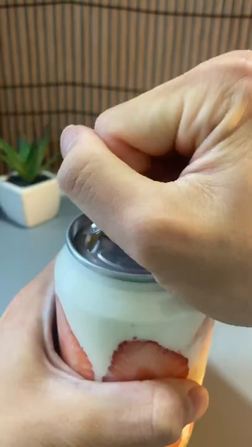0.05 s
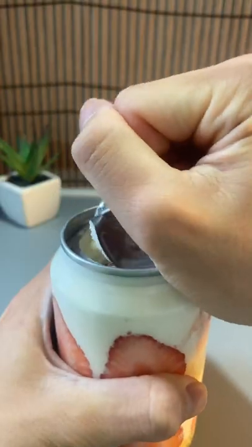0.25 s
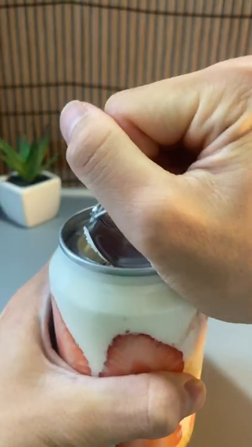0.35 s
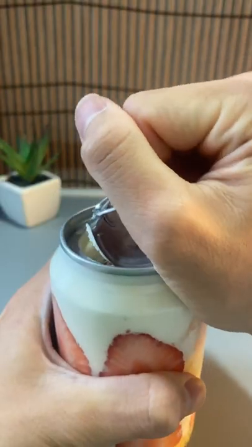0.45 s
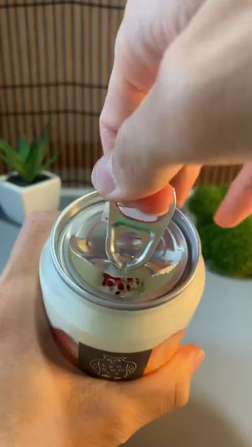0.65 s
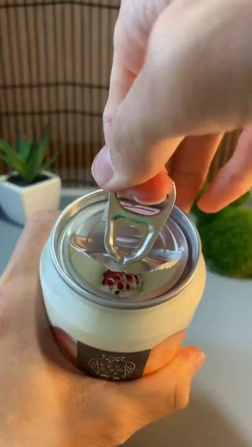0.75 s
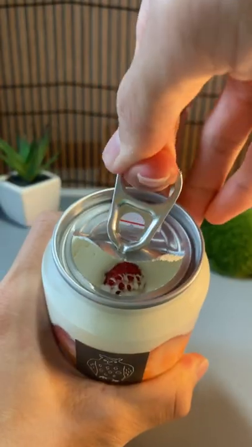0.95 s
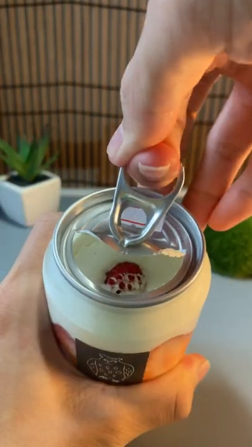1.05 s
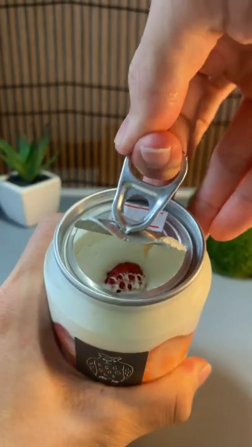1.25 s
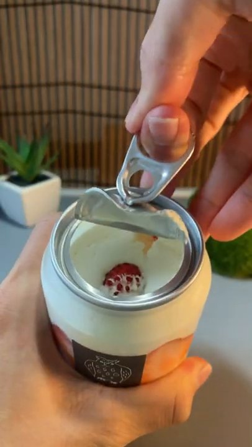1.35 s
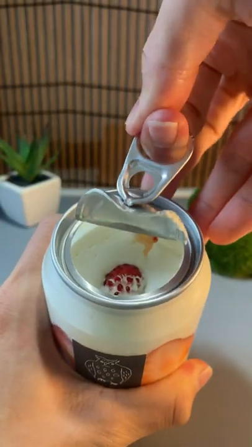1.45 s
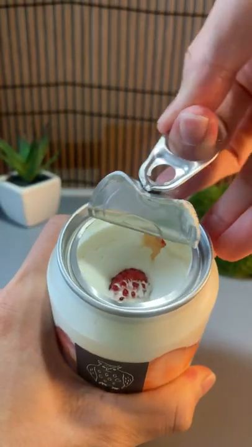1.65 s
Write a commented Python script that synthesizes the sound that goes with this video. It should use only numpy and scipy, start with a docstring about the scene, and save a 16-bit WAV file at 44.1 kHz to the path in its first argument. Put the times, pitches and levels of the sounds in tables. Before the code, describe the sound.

A metal can lid cracks open with a tab click, short rip and loud pop. After a pause it peels back with ticks, a quick tear, a springy clack and a light scrape, heard close in a small room.

```python
"""A pull-tab can is opened on a table, close to the microphone, in a small room.
The tab ticks, rips the score line and pops the lid in. Peeled back, the lid gives way in small snaps,
buckles with dull thumps, tears in one quick run, springs up and scrapes on the rim.
Each fracture or slip is a brief force that excites the resonances of the metal sheet: a single
impulse is heard as a snap, a short volley as a jerk, a dense random train as a crackle."""
import sys
import numpy as np
from scipy import signal
from scipy.fft import rfft, irfft
from scipy.io import wavfile
from scipy.ndimage import uniform_filter1d

SR = 44100
rng = np.random.default_rng(int(sys.argv[2]) if len(sys.argv) > 2 else 0)


def unload_audio(sound):
    """Save the sound as a 16-bit wav file, at the path given as the first command line argument."""
    columns = np.transpose(np.atleast_2d(sound))
    # keep every value between -1 and 1, then stretch to whole-number steps
    steps = np.round(np.clip(columns, -1, 1) * 32767)
    wavfile.write(sys.argv[1], SR, steps.astype(np.int16))


N = 74970
TIME = np.arange(N) / SR
RING_SAMPLES = 4096
RING_TIME, RING_HZ = np.arange(RING_SAMPLES) / SR, np.fft.rfftfreq(RING_SAMPLES, 1 / SR)
PORT_SPREAD = .14  # relative part of a force that differs between the two microphone ports


def amp(db):
    """Amplitude grows tenfold for every 20 dB."""
    return 10 ** (np.asarray(db) / 20)


def unit(x):
    """Normalisation to a mean energy of 1 per channel."""
    return x / np.sqrt(np.sum(x ** 2, axis=-1).mean() + 1e-20)


def read(points, hz):
    """Interpolation on a logarithmic frequency axis."""
    f, value = np.transpose(points)
    return np.interp(np.log(hz + 1), np.log(f + 1), value)


def add(mix, s, sound):
    """Superposition: a sound joins the mix at s seconds."""
    part = mix[:, max(round(s * SR), 0):][:, :sound.shape[-1]]
    part += sound[..., :part.shape[-1]]


def through(x, response):
    """Linear filtering by convolution, cut to the input's length."""
    return signal.fftconvolve(np.atleast_2d(x), np.atleast_2d(response), axes=1)[:, :x.shape[-1]]


def ring(spectrum, pitch=1, ripple_db=2, apart_hz=900, lag_cycles=.91):
    """Causal impulse response at both ports: a spectrum with mild chance peaks, its bass trailing."""
    ripple = uniform_filter1d(rng.standard_normal((3, len(RING_HZ))), size=28)
    ripple = unit(uniform_filter1d(ripple, size=18)) * np.sqrt(len(RING_HZ))
    apart = RING_HZ / (RING_HZ + apart_hz)  # treble radiates differently to each port
    log_gain = np.log(amp(read(spectrum, RING_HZ / pitch) + ripple_db * (ripple[0] + apart * ripple[1:])))
    minimum_phase = -signal.hilbert(np.hstack([log_gain, log_gain[:, -2:0:-1]])).imag[:, :len(RING_HZ)]
    lag = 2 * np.pi * lag_cycles * np.log(1 + RING_HZ / 20)
    fade = np.hanning(2 * RING_SAMPLES)[RING_SAMPLES:]
    return unit(irfft(np.exp(log_gain + 1j * (minimum_phase - lag))) * fade)


def blow(db):
    """Equal energy: the impulse that matches 1.5 ms of sound at this level."""
    return amp(db) * np.sqrt(.0015 * SR)


def snaps(rows, body, edge, sag=0, decay_s=.0007):
    """Impulse excitation: each snap rings the body, and a spray of tiny fractures rings the edge."""
    out = np.zeros((2, N))
    pitches = 1 + sag * np.linspace(.5, -.5, len(rows))
    for (s, ring_db, edge_db), pitch in zip(rows, pitches):
        fractures = rng.standard_normal(RING_SAMPLES) + PORT_SPREAD * rng.standard_normal((2, RING_SAMPLES))
        spray = (RING_TIME == 0) + .4 * fractures * np.exp(-RING_TIME / decay_s)
        add(out, s, blow(ring_db) * ring(body, pitch) + blow(edge_db) * unit(through(spray, ring(edge))))
    return out


def jerks(rows, body, edge, length_s=.0027):
    """Burst excitation: each brief volley of fractures or slips drives the body and the edge."""
    out = np.zeros((2, N))
    swell = np.sin(np.pi * np.sqrt(np.minimum(RING_TIME / length_s, 1)))
    for s, ring_db, edge_db in rows:
        force = rng.standard_normal(RING_SAMPLES) + PORT_SPREAD * rng.standard_normal((2, RING_SAMPLES))
        for db, spectrum in (ring_db, body), (edge_db, edge):
            add(out, s, blow(db) * unit(through(swell * force, ring(spectrum))))
    return out


def crackle(curve, body, edge, per_s, spread_db):
    """Shot noise: randomly timed slips of uneven size drive the body and the edge."""
    s, ring_db, edge_db = np.transpose(curve)
    size = amp(spread_db * np.minimum(rng.exponential(1, N), 2)) * rng.choice([-1, 1], N)
    size = size * (1 + PORT_SPREAD * rng.standard_normal((2, N)))
    slips = unit(size * (rng.random(N) < per_s / SR)) * np.sqrt(N)
    return sum(through(slips * amp(np.interp(TIME, s, db, left=-120, right=-120)), ring(spectrum))
               for db, spectrum in [(ring_db, body), (edge_db, edge)])


# Spectrum of the rumble. Each row: frequency in Hz, relative level in dB.
RUMBLE_SPECTRUM = [(20, -7), (90, -1), (400, -25.5), (2000, -32.5), (10000, -53), (16000, -60)]
# Its envelope. Each row: time in seconds, level in dB.
RUMBLE_LEVEL = [(0, -59), (.85, -67), (1.1, -63.5)]
def rumble():
    """Long waves from the room and the hands on the can reach both ports nearly alike."""
    noise = rng.standard_normal(N) + amp(-20) * rng.standard_normal((2, N))
    return through(noise, ring(RUMBLE_SPECTRUM)) * amp(np.interp(TIME, *np.transpose(RUMBLE_LEVEL)))


# Spectra of the taut lid and its bright edge. Each row: frequency in Hz, relative level in dB.
TAUT_LID = [(60, -21), (200, -7.5), (560, -23.5), (1050, -12), (1240, 0), (1420, -4), (1700, 5),
            (1930, -3.5), (2230, 2.5), (2600, -3.5), (3400, -13.5), (4200, -31), (9000, -46)]
TAUT_EDGE = [(300, -32.5), (3300, 3.5), (5000, 3), (7100, 4.5), (10500, -2.5), (13000, -6), (15500, -1)]
# Envelope of the rubbing. Each row: time in seconds, lid level in dB, edge level in dB.
FINGER_RUB = [(0, -72, -78), (.45, -81.5, -89), (.6, -71, -83), (.685, -73, -67)]
def finger_rub():
    """Stick-slip friction of a finger faintly excites the taut lid."""
    return crackle(FINGER_RUB, TAUT_LID, TAUT_EDGE, per_s=4300, spread_db=9)


# Resonances of the tab. Each row: frequency in Hz, relative level in dB.
TAB_SPECTRUM = [(560, -22.5), (750, -6), (1300, -11), (1680, 8), (2500, -7.5), (3100, -3.5), (4200, -32.5)]
# Clicks of the tab. Each row: start in seconds, tab level in dB, edge level in dB.
TAB_CLICKS = [(.0753, -44.5, -53.5), (.0975, -29, -39), (.469, -53.5, -67), (.635, -58, -65)]
def tab_clicks():
    """Impacts against the closed lid set the tab in free vibration."""
    return snaps(TAB_CLICKS, TAB_SPECTRUM, TAUT_EDGE)


# Jerks and crackle envelope of the rip. Each row: time in seconds, lid level in dB, edge level in dB.
RIP_JERKS = [(.2031, -20, -22), (.2049, -14, -18.5), (.2133, -18, -22.5), (.2232, -19, -13.5),
             (.2281, -30.5, -20.5), (.2412, -19.5, -26)]
RIP_CRACKLE = [(.201, -54.5, -63), (.205, -25, -28.5), (.231, -24, -24.5), (.253, -28, -34),
               (.264, -43, -53)]
def score_rip():
    """Fracture advances along the score line in jerks, ringing the taut lid."""
    return (jerks(RIP_JERKS, TAUT_LID, TAUT_EDGE)
            + crackle(RIP_CRACKLE, TAUT_LID, TAUT_EDGE, per_s=5000, spread_db=7))


# The pop and its rebounds. Each row: start in seconds, lid level in dB, edge level in dB.
POPS = [(.2495, -8.5, -34.5), (.2518, -14, -39.5), (.2538, -21.5, -42.5)]
def lid_pop():
    """A sudden release of strain: the lid pops in and rebounds."""
    return snaps(POPS, TAUT_LID, TAUT_EDGE)


# Resonances of the can wall. Each row: frequency in Hz, relative level in dB.
WALL_SPECTRUM = [(80, -10.5), (1150, 11), (2000, -3), (3400, 4.5), (8000, -35)]
def finger_knock(start_s=.534, level_db=-42):
    """One soft impact of a finger sounds the impulse response of the can wall."""
    out = np.zeros((2, N))
    add(out, start_s, blow(level_db) * ring(WALL_SPECTRUM))
    return out


# Spectra of the buckling sheet. Each row: frequency in Hz, relative level in dB.
THUMP = [(20, -20.5), (80, 3), (190, -6.5), (330, -5), (480, -20.5), (720, -13), (4000, -75.5)]
CLACK = [(200, -16.5), (1000, -6), (1550, 10), (2300, -10.5), (2950, -0.5), (3700, -20.5), (16000, -35)]
SHUDDER = [(30, -33.5), (85, 6), (700, -20), (1500, -49), (3000, -30), (6000, -55)]
# Flips of the sheet. Each row: start in seconds, thump level in dB, clack level in dB.
BUCKLES = [(0.911, -33, -41.5), (1.0126, -36.5, -44), (1.1137, -32.5, -40.5), (1.2189, -37, -41),
           (1.3963, -16, -21.5), (1.4665, -30.5, -39)]
def buckles(shudder_db=-12.5, rise_s=.0028, t60_s=.24):
    """Snap-through buckling: the sheet flips with a clack and a falling thump, then trembles."""
    out, t = np.zeros((2, N)), np.arange(SR // 2) / SR
    swell = 1 - np.exp(-t / rise_s)
    for s, thump_db, clack_db in BUCKLES:
        add(out, s, blow(thump_db) * ring(THUMP) + blow(clack_db) * ring(CLACK))
        tremble = rng.standard_normal(len(t)) * swell * amp(thump_db + shudder_db - 60 * t / t60_s)
        add(out, s, through(tremble, ring(SHUDDER)))
    return out


# Spectra of the bent lid and its torn edge. Each row: frequency in Hz, relative level in dB.
BENT_LID = [(500, -25.5), (1200, -9.5), (1450, 6), (1620, 5.5), (1950, 2.5), (2300, -17), (3400, -21.5),
            (6000, -53)]
TORN_EDGE = [(300, -18.5), (900, 1), (2900, -1.5), (4800, 8), (6800, 1.5), (10000, -8), (15500, -6.5)]
# Snaps of the seam. Each row: start in seconds, lid level in dB, edge level in dB.
PEEL_SNAPS = [(.9253, -35, -58), (.94, -24, -35.5), (.9886, -38.5, -54.5), (.9931, -39.5, -68),
              (1.0046, -38.5, -58), (1.0417, -39.5, -77), (1.0555, -40.5, -70), (1.0718, -39.5, -63),
              (1.1402, -34, -65), (1.1453, -28.5, -48), (1.1614, -32.5, -51.5), (1.1776, -32, -48),
              (1.1982, -36.5, -65), (1.2215, -31.5, -46.5), (1.2256, -29.5, -46.5), (1.237, -30, -42.5),
              (1.2645, -31, -45), (1.2735, -28.5, -43)]
def peel():
    """A larger plate rings lower: the pitch sags from snap to snap as more lid comes free."""
    return snaps(PEEL_SNAPS, BENT_LID, TORN_EDGE, sag=.091)


# Jerks and crackle envelope of the tear. Each row: time in seconds, lid level in dB, edge level in dB.
TEAR_JERKS = [(1.2838, -28, -33), (1.287, -25, -37), (1.2973, -28.5, -32), (1.3156, -44, -26.5),
              (1.3225, -27, -24.5), (1.3327, -33.5, -29), (1.3421, -42, -26.5), (1.3483, -35, -36),
              (1.3618, -34, -28)]
TEAR_CRACKLE = [(.91, -72.5, -75), (1.268, -58, -82.5), (1.277, -36.5, -55.5), (1.325, -38, -41.5),
                (1.36, -58.5, -43), (1.385, -85, -85)]
def seam_tear():
    """Crack propagation: the seam creeps faintly, then tears in one run that drives the bent lid."""
    return (jerks(TEAR_JERKS, BENT_LID, TORN_EDGE)
            + crackle(TEAR_CRACKLE, BENT_LID, TORN_EDGE, per_s=10000, spread_db=3))


# Resonances of the loose lid. Each row: frequency in Hz, relative level in dB.
LOOSE_LID = [(400, -16), (1000, 5.5), (2600, -2), (4200, 1), (4680, 8), (6200, -10.5), (7700, 6.5),
             (9000, -19.5)]
# Catches and scrape envelope. Each row: time in seconds, lid level in dB, edge level in dB.
RIM_CATCHES = [(1.4962, -55.5, -57), (1.5215, -43.5, -53.5), (1.5412, -43.5, -52.5), (1.5778, -41.5, -59),
               (1.5945, -36, -45.5)]
RIM_SCRAPE = [(1.485, -95, -78), (1.535, -57.5, -60), (1.595, -70.5, -84), (1.64, -71, -78)]
def rim_scrape():
    """Stick-slip friction: the loose lid catches and slides on the rim."""
    return (jerks(RIM_CATCHES, LOOSE_LID, TORN_EDGE)
            + crackle(RIM_SCRAPE, LOOSE_LID, TORN_EDGE, per_s=3000, spread_db=8.5))


# Lead of the left port over the right. Each row: frequency in Hz, phase in radians.
LEFT_LEAD = [(1900, 0.38), (4800, 1.2), (6700, 2.56), (11000, 6.94), (16000, 11)]
def ports(x, left_minus_right_db=-2):
    """Direct sound reaches the two microphone ports with a difference of phase and level."""
    hz = np.fft.rfftfreq(2 * N, 1 / SR)
    left = amp(left_minus_right_db / 2) * np.exp(.5j * read(LEFT_LEAD, hz))
    return irfft(rfft(x, 2 * N) * np.array([left, 1 / left]))[:, :N]


# Reverberation of the room. Each row: frequency in Hz, time to decay by 60 dB in seconds.
ROOM_T60 = [(100, .25), (4000, 0.2), (8000, 0.079)]
def room(x, echo_db=-11.5, tail_db=-19, late_db=-37, late_t60_s=.55, mono_below_hz=450):
    """Reflection: echoes off table and hands, a short tail and a faint late ring in the lid's range."""
    t = np.arange(SR) / SR
    early, dense, late = rng.standard_normal((3, 2, SR))
    hz, frame_s, bands = signal.stft(dense * (t > .007), SR, nperseg=256)
    decay = amp(-60 * frame_s / read(ROOM_T60, hz)[:, None])
    tail = signal.istft(bands * decay, SR, nperseg=256)[1][:, :SR]
    late = through(late * amp(-60 * t / late_t60_s), ring(TAUT_LID))
    arrivals = (rng.random((2, SR)) < 2500 / SR) * (t > .0015)
    echoes = early * arrivals * np.exp(-t / .013)
    response = amp(tail_db) * unit(tail) + amp(late_db) * unit(late) + amp(echo_db) * unit(echoes)
    bass = signal.lfilter(*signal.butter(1, mono_below_hz, fs=SR), response)
    return through(x, response - bass + bass.mean(0))


def scene():
    """Superposition of the can's direct sound, its reflections and the rumble."""
    can = (finger_rub() + tab_clicks() + score_rip() + lid_pop() + finger_knock()
           + buckles() + peel() + seam_tear() + rim_scrape())
    return ports(can) + room(can) + rumble()


def record(dry):
    """Band limiting: a linear-phase low-pass removes the highest treble."""
    cutoff_hz = 15780
    lowpass = signal.firwin(511, cutoff_hz, window=("kaiser", 9), fs=SR)
    return signal.oaconvolve(dry, lowpass[None], "same")


dry = scene()
out = record(dry)
unload_audio(out)
```